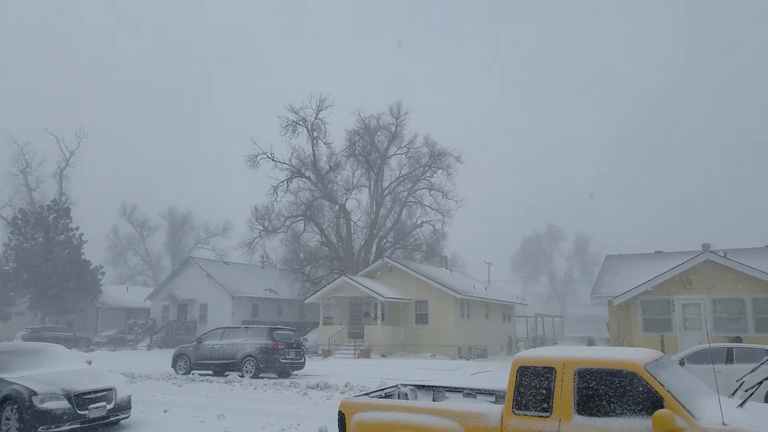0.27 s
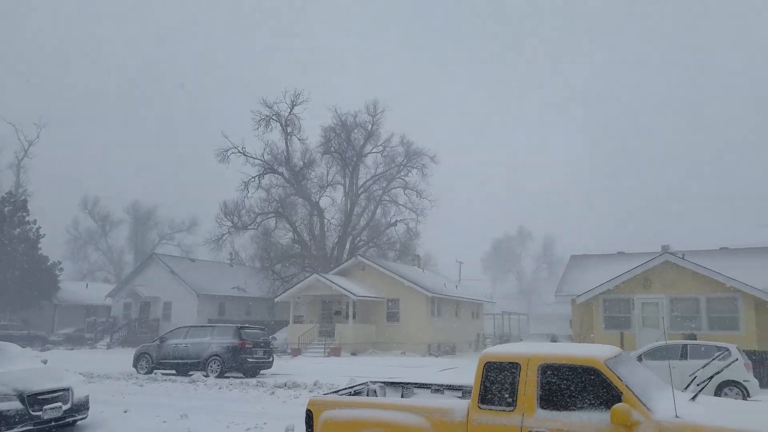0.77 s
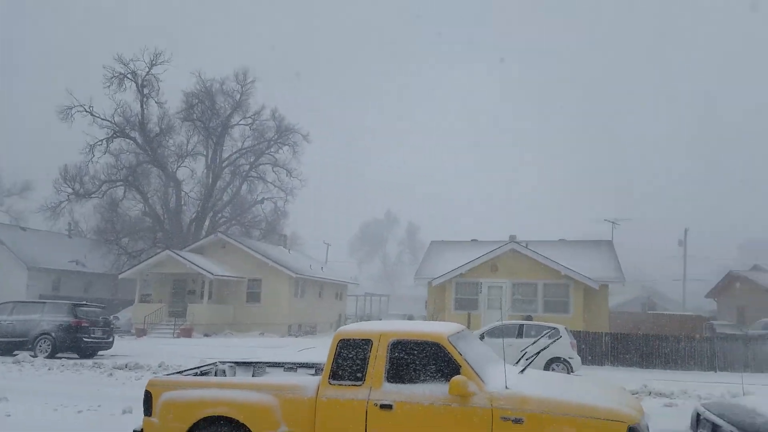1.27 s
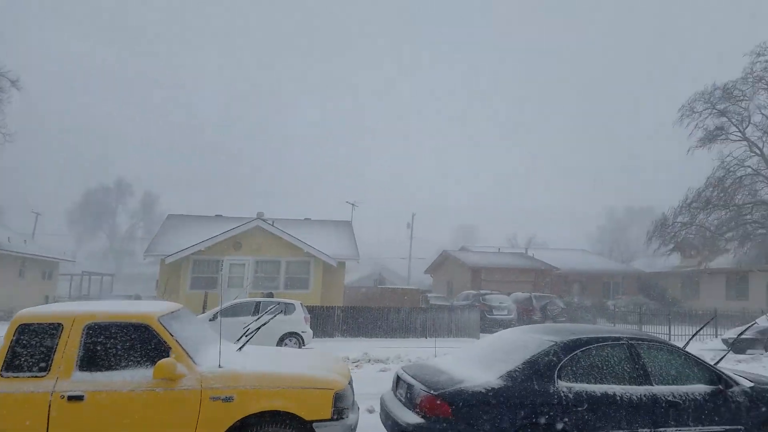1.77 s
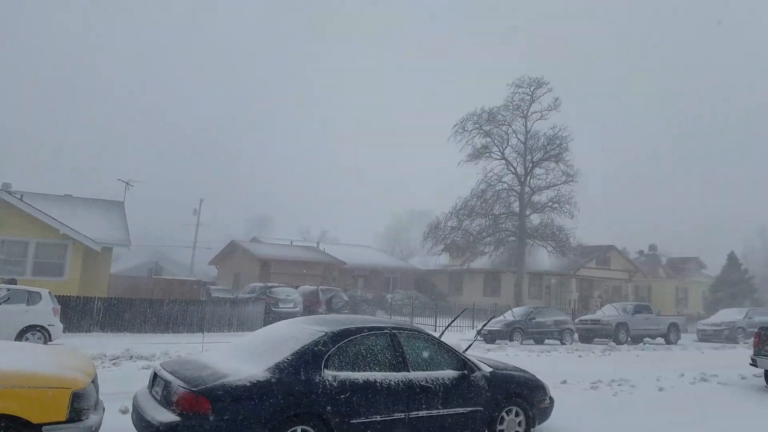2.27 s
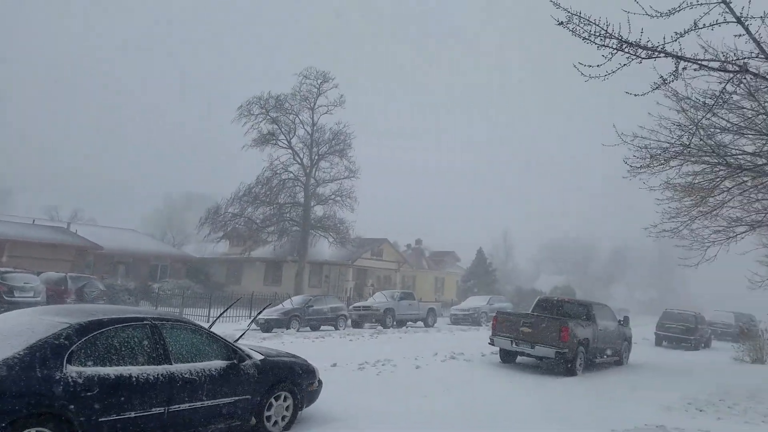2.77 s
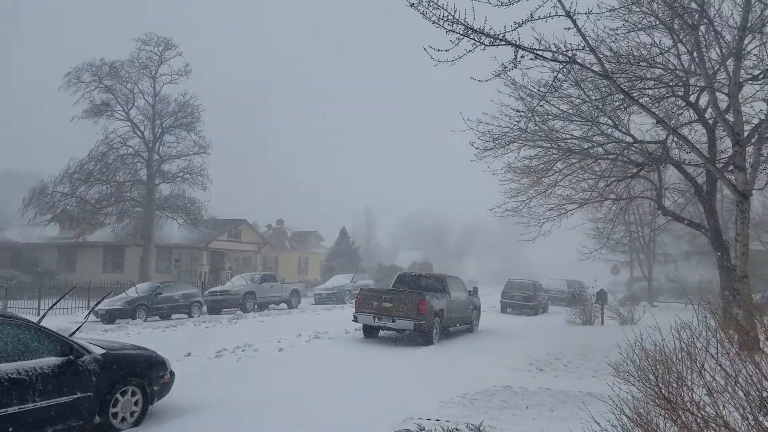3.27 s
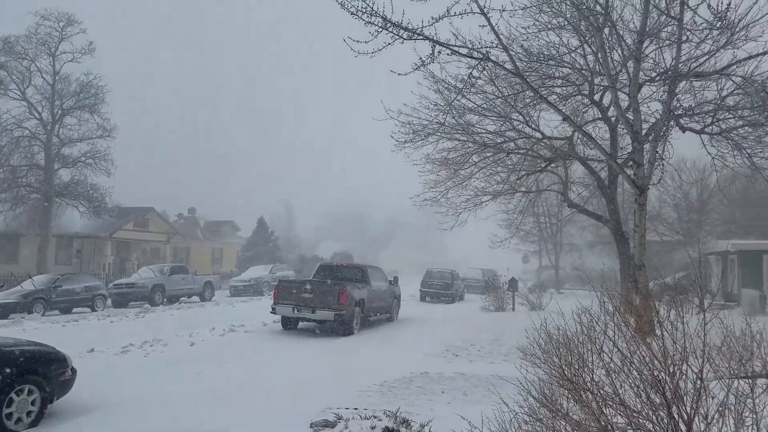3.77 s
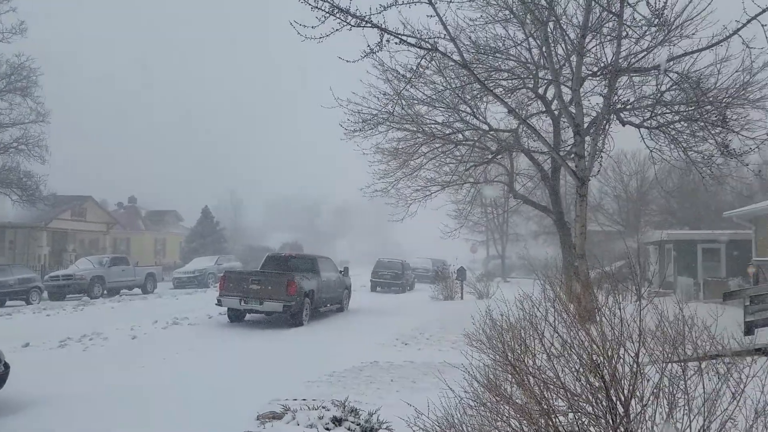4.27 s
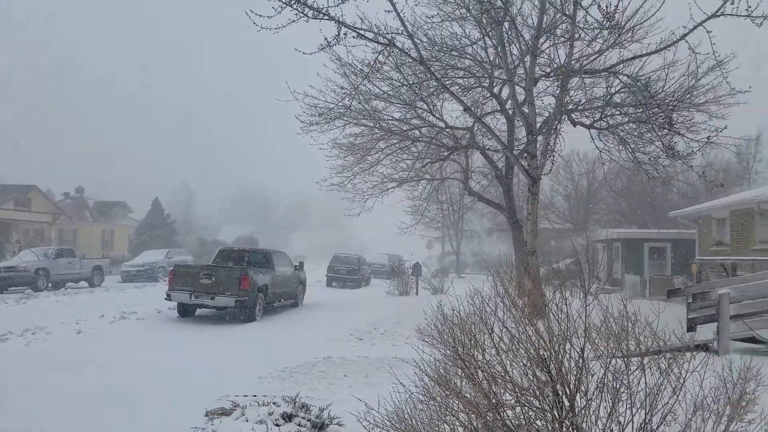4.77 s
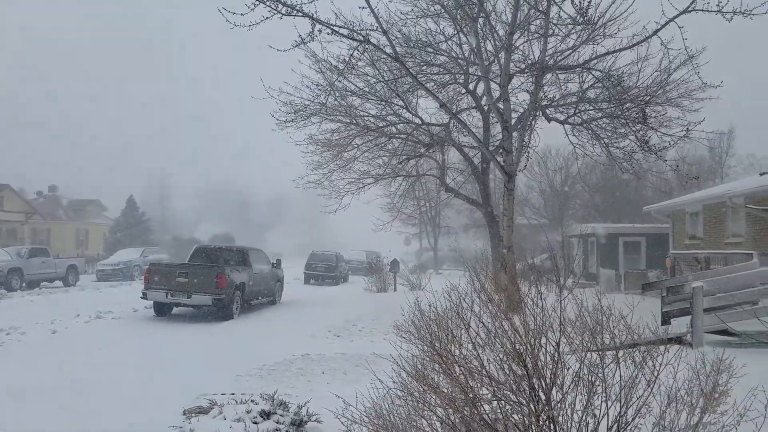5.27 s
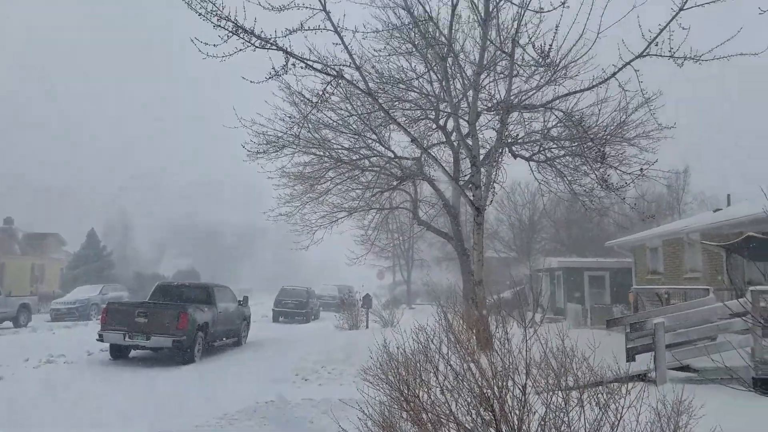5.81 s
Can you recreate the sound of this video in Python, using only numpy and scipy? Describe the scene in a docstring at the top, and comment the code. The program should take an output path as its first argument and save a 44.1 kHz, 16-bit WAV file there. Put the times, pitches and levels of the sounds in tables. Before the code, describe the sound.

A six-cylinder engine throbs at fast idle close by throughout, parked on a residential street in a snowstorm. At first its low drone is muffled, with a soft whir of belts and wind rushing through trees. Between about 1.6 and 2 seconds the microphone turns: the drone swells into a much louder boom, and the engine slides from slightly right to left. It stays dominant, wavering gently in speed and level. A faint high whine comes and goes around 1.5 seconds, and small gusts hiss in branches between 1 and 3.2 seconds. Two faint low howls follow near 3.3 and 4 seconds. Icy flakes tick on the microphone, with one sharper tap on the left at 3.5 seconds; the ticks and a fine hiss thicken after 5 seconds. Wind buffets the microphone with low thumps from about 4.5 seconds, strongest at 6 seconds.

```python
"""A six-cylinder engine throbs at fast idle close by, parked on a residential street in a snowstorm.
Its firings drone from the exhaust and boom as the microphone turns; the whir of belts slides left.
Wind rushes through the trees and buffets the microphone's two ports; a few thin tones come and go.
Thickening snow hisses past, and icy flakes tick on the microphone's housing."""
import sys
import numpy as np
from scipy import signal
from scipy.fft import rfft, irfft
from scipy.io import wavfile

SR = 44100
rng = np.random.default_rng(int(sys.argv[2]) if len(sys.argv) > 2 else 0)


def generate_wav(signal):
    """Clip the signal to [-1, 1] and save it as 16-bit WAV at the path in sys.argv[1]."""
    frames = np.transpose(np.atleast_2d(signal))
    scaled = np.clip(frames, -1, 1) * 32767
    pcm = np.round(scaled).astype(np.int16)
    wavfile.write(sys.argv[1], SR, pcm)


N = 266496
TIME = np.arange(N) / SR
FREQS = np.fft.rfftfreq(N, 1 / SR)
BOOM_REF_DB = -25.5   # drone level at which boom_db is 0


# firing tones: (crank multiple [x], level re drone [dB], share of boom followed [ratio])
EXHAUST_TONES = [(3, -11, .85), (4.5, -9.3, .82), (5, -27, .8), (6, -.1, 1), (7.5, -27, .9), (9, -15, .85),
                 (10.5, -23, .7), (12, -34, .7), (13.5, -23, .55)]

def exhaust(turns, boom_db, unsteady_db=0.02, roughness=0.022, surge_turns=0.0085, pipe_lag_rad=0.52):
    """Firings give tones on crank multiples; the pipe delays each differently, and no two firings match."""
    load_db = unsteady_db * drift(7)
    # unequal cylinders: the crank surges and lags once in two turns
    crank = turns + surge_turns * np.sin(np.pi * turns)
    tones = 0
    for multiple, db, share in EXHAUST_TONES:
        level_db = BOOM_REF_DB + db + share * boom_db + load_db
        phase = 2 * np.pi * multiple * crank - pipe_lag_rad * multiple ** 2 + roughness * drift(19)
        flutter = 1 + roughness * drift(9.7)
        tones += np.sqrt(2) * from_db(level_db) * flutter * np.sin(phase)
    return from_engine(tones)


# tailpipe noise: (frequency [Hz], density [dB/Hz])
RUMBLE_SPECTRUM = [(40, -92), (70, -63.5), (105, -52), (135, -65.5), (175, -61.5), (210, -70.5), (255, -70),
                   (300, -69.5), (350, -78.5), (600, -92)]

def tailpipe_rumble(turns, boom_db):
    """Gas leaves the tailpipe in turbulent puffs."""
    puffs = firing_pulses(turns, bank_depth=0.33, engine_depth=0.25)
    return from_engine(noise(RUMBLE_SPECTRUM) * puffs * from_db(boom_db))


# belt-driven hums: (crank multiple [x], level [dB], share of boom followed [ratio])
FAN_HUMS = [(15.3, -47.5, .55), (16.9, -54.5, -.15)]

def fan_and_pump(turns, boom_db, waver_db=1.6, slip_rad=0.33):
    """Belt-driven fan and pump hum between the crank's harmonics."""
    hums = 0
    for multiple, db, share in FAN_HUMS:
        level_db = db + share * boom_db + waver_db * drift(6.2)
        phase = 2 * np.pi * multiple * turns + slip_rad * drift(5.5)
        hums += np.sqrt(2) * from_db(level_db) * np.sin(phase)
    return from_engine(hums)


# belt and pulley noise: (frequency [Hz], density [dB/Hz])
WHIR_SPECTRUM = [(250, -79), (400, -82), (560, -75), (850, -81), (1080, -83), (1450, -80), (1600, -85.5),
                 (1780, -79), (2050, -84.5), (2600, -88.5), (3300, -94), (4000, -94.5), (6000, -105),
                 (9000, -118)]
# bay resonances: (frequency [Hz], width [Hz], level [dB], pan L-R [dB])
BAY_RINGS = [(1450, 17, -62, 3), (1680, 24, -64, -3), (1757, 40, -67, -2), (1999, 46, -61.5, -3.5),
             (2101, 42, -63, -2)]

def engine_bay(turns, whir_db, waver_db=2.0):
    """Belts and pulleys whir, throbbing with the firings, and keep a few narrow rings going."""
    throb = firing_pulses(turns, bank_depth=0.1, engine_depth=0.14)
    bay = from_engine(noise(WHIR_SPECTRUM) * throb * from_db(whir_db + 0.72 * drift(9)))
    for hz, width_hz, db, pan_db in BAY_RINGS:
        ring = narrow_noise(hz, width_hz) * from_db(db + whir_db + waver_db * drift(5))
        bay += from_engine(ring) * panned(pan_db)
    return bay


def firing_pulses(turns, bank_depth, engine_depth):
    """Each bank fires three times in two turns, the whole engine six times."""
    return 1 + bank_depth * np.cos(3 * np.pi * turns) + engine_depth * np.cos(6 * np.pi * turns)


def microphone_turn(speed_rps, start_s=1.58, length_s=0.46, idle_rps=17.2, rev_db_per_rps=4,
                    muffled_db=-36.5, booming_db=-23.5, whir_before_db=-5, whir_after_db=-1):
    """Boom and whir gains in dB: both rise as the microphone turns; the boom then follows the speed."""
    turned = np.clip((TIME - start_s) / length_s, 0, 1)
    revving_db = booming_db + rev_db_per_rps * (speed_rps - idle_rps)
    drone_db = muffled_db + turned * (revving_db - muffled_db)
    whir_db = whir_before_db + turned * (whir_after_db - whir_before_db)
    facing_bay_db = 0.5 * swell(centre_s=2.1, length_s=0.6)
    return drone_db - BOOM_REF_DB, whir_db + facing_bay_db


# engine bearing: (time [s], lead at left port [ms])
LEFT_LEAD_MS = [(0, -0.24), (.75, -0.19), (1.35, 0.013), (1.95, 0.27), (2.3, 0.4), (2.8, 0.51),
                (6.04, 0.45)]

def from_engine(sound):
    """The engine's sound reaches the nearer port first."""
    lead_s = in_time(LEFT_LEAD_MS) / 1000
    return np.array([np.interp(TIME + side * lead_s / 2, TIME, sound) for side in (1, -1)])


# idle speed: (time [s], crank rate [turns/s])
CRANK_RPS = [(0.0, 17.57), (0.45, 17.59), (0.95, 17.31), (1.35, 16.95), (1.75, 16.97), (2.1, 17.46),
             (2.4, 17.64), (2.65, 17.28), (3.15, 17.1), (3.88, 16.95), (4.17, 17.18), (4.45, 17.0),
             (4.73, 17.45), (4.97, 17.12), (5.5, 17.41), (5.78, 16.86), (6.04, 17.01)]

def engine(shade_db_per_ms=3.5):
    """The engine hunts about its idle; with the exhaust on the left, the right port is slightly shaded."""
    speed_rps = in_time(CRANK_RPS)
    turns = np.cumsum(speed_rps) / SR
    boom_db, whir_db = microphone_turn(speed_rps)
    drone = exhaust(turns, boom_db) + tailpipe_rumble(turns, boom_db) + fan_and_pump(turns, boom_db)
    shade_db = shade_db_per_ms * np.maximum(in_time(LEFT_LEAD_MS), 0)
    return drone * panned(shade_db) + engine_bay(turns, whir_db)


# wind strength: (time [s], rush gain [dB])
RUSH_GAIN_DB = [(0, 1.2), (1.4, 2.5), (2.2, 5), (3.6, 1.5), (6.04, 0)]
# rush in trees, hiss in twigs: (frequency [Hz], density [dB/Hz])
RUSH_SPECTRUM = [(100, -74.5), (350, -76), (600, -77.5), (850, -78.5), (1100, -87), (1500, -85),
                 (2000, -85.5), (2500, -88), (3200, -96.5), (5000, -112)]
TWIG_SPECTRUM = [(2000, -108), (3000, -97.5), (4000, -96.5), (5500, -103), (6200, -101), (7100, -106),
                 (8000, -103), (9200, -114), (12000, -120)]

def wind_in_trees(waver_db=0.98, twigs_start_db=-4.5, twigs_db_per_s=1.22):
    """Wind rushes through the trees; the hiss of bare twigs grows as the near tree comes round."""
    rush = diffuse(RUSH_SPECTRUM, alike_hz=750) * from_db(in_time(RUSH_GAIN_DB) + waver_db * drift(7.6))
    twigs_db = twigs_start_db + twigs_db_per_s * TIME
    twigs = diffuse(TWIG_SPECTRUM, alike_hz=480) * from_db(twigs_db + waver_db * drift(26))
    return rush + twigs


# buffeting: (frequency [Hz], density [dB/Hz])
EDDY_SPECTRUM = [(8, -91.5), (22, -72), (40, -70), (70, -56.5), (150, -77.5), (300, -75.5), (600, -91.5)]
# strongest eddies: (time [s], gain [dB])
EDDY_THUMPS = [(4.55, 3), (5.0, -2), (5.68, 0), (5.98, 9.5)]

def port_eddies(start_db=-20.5, rise_db_per_s=4, thump_s=0.13, waver_db=1.5):
    """Eddies buffet the ports harder as the microphone leaves shelter; the strongest thump."""
    thumps = sum(from_db(db) * swell(s, thump_s) for s, db in EDDY_THUMPS)
    gain = from_db(start_db + rise_db_per_s * TIME) + thumps
    return diffuse(EDDY_SPECTRUM, alike_hz=40) * gain * from_db(waver_db * drift(4))


# gusts in branches: (time [s], level [dB])
BRANCH_GUSTS = [(0.966, -52), (1.45, -53), (1.95, -54), (2.4, -56), (3.2, -49.5)]
# sheets of loose snow: (time [s], length [s], level [dB])
SNOW_SWISHES = [(0.1, 0.81, -67.5), (2.4, 0.4, -67)]

def gusts():
    """Gusts swell and fade, singing in branches and sweeping loose snow along."""
    branches = air_band(hz=2230, width_hz=770)
    branches *= sum(from_db(db) * swell(s, length_s=0.15) for s, db in BRANCH_GUSTS)
    loose_snow = air_band(hz=5200, width_hz=2000)
    loose_snow *= sum(from_db(db) * swell(s, length_s) for s, length_s, db in SNOW_SWISHES)
    return branches + loose_snow


# whine and howls: (time [s], length [s], frequency [Hz], width [Hz], level [dB])
THIN_TONES = [(1.5, 1.06, 1467, 60, -52), (3.3, 0.42, 467, 23, -50), (4.05, 0.33, 467, 20, -51)]

def thin_tones():
    """Thin tones come and go: a high belt-like whine and two low howls."""
    return sum(air_band(hz, width_hz) * from_db(db) * swell(s, length_s)
               for s, length_s, hz, width_hz, db in THIN_TONES)


# snowfall: (time [s], flakes per port [1/s])
FLAKES_PER_S = [(0, 20), (3.4, 34), (5.1, 65), (5.35, 130), (6.04, 140)]
# fine snow: (frequency [Hz], density [dB/Hz])
SNOW_SPECTRUM = [(5000, -116), (8000, -110), (9400, -110), (11000, -106), (13000, -103.5), (15500, -102.5),
                 (17000, -103)]

def snow(smallest_db=-55.5, spread_db=5.0, knock_db=-2, ref_per_s=43, db_per_doubling=1.4):
    """Flakes tick at random on either port and fine snow hisses past, both louder as the fall thickens."""
    rate_per_s = in_time(FLAKES_PER_S)
    thickness_db = db_per_doubling * np.log2(rate_per_s / ref_per_s)
    size_db = smallest_db + spread_db * np.minimum(rng.exponential(1, (2, N)), np.e)
    landings = rng.random((2, N)) < rate_per_s / SR
    ticks = from_db(size_db + thickness_db) * landings * rng.choice([-1, 1], (2, N))
    hiss = diffuse(SNOW_SPECTRUM, alike_hz=480) * from_db(thickness_db + 0.5 * drift(20))
    return housing(ticks, ticks * from_db(knock_db)) + hiss


# larger grains: (time [s], impact level [dB], pan L-R [dB], knock re tick [dB])
GRAIN_HITS = [(.0885, -45, -10, 3), (.0965, -44, -8, 4), (3.0619, -45, 8, -10), (3.4935, -33.5, 21.5, 9.5),
              (3.6706, -46, 8, -10), (4.6483, -39, 11, -15), (4.8519, -37, 15, -15), (4.9716, -42, 8.5, -6),
              (5.3398, -44, -7, -3), (5.4188, -42, .5, -4), (5.676, -44, 5, -10), (5.874, -38.5, 12, -6),
              (5.9793, -45, 1, 0)]

def ice_grains(fragment_gain=0.33, shatter_s=0.0012):
    """Icy grains knock on the housing and break up for about a millisecond."""
    ticks, knocks = np.zeros((2, N)), np.zeros((2, N))
    age_s = np.arange(SR // 250) / SR
    for s, db, pan_db, knock_db in GRAIN_HITS:
        start, sides = int(s * SR), panned(pan_db)
        impact = -from_db(db) * sides / sides.mean()
        fragments = fragment_gain * rng.standard_normal(len(age_s)) * np.exp(-age_s / shatter_s)
        ticks[:, start:start + len(age_s)] += impact * ((age_s == 0) + fragments)
        knocks[:, start:start + 1] += impact * from_db(knock_db)
    return housing(ticks, knocks)


# housing resonances: (frequency [Hz], gain [dB], T60 [s])
HOUSING_MODES = [(900, 6.5, 0.00096), (3020, -0.5, 0.0018), (6430, -19.5, 0.0078), (8200, -10, .005),
                 (10600, -4.5, 0.00076), (13000, -3.5, .0012), (15100, -8.5, .002)]

def housing(ticks, knocks, split_hz=9400):
    """The microphone's housing rings briefly: knocks drive its lower modes, ticks its upper ones."""
    ringing = 0
    for hz, db, t60_s in HOUSING_MODES:
        radius, angle = from_db(-60 / (t60_s * SR)), 2 * np.pi * hz / SR
        feedback = [1, -2 * radius * np.cos(angle), radius ** 2]
        drive = knocks if hz < split_hz else ticks
        ringing += from_db(db) * signal.lfilter([0, np.sin(angle)], feedback, drive + 1e-18)
    return ringing


def from_db(db):
    """Decibels to gain."""
    return 10 ** (np.asarray(db) / 20)


def panned(pan_db):
    """Left and right gains for a level difference."""
    return from_db(np.array([[0.5], [-0.5]]) * pan_db)


def in_time(curve):
    """A curve's value at every sample."""
    return np.interp(TIME, *np.transpose(curve))


def in_frequency(curve):
    """A curve's value at every FFT bin, interpolated in log frequency."""
    hz, values = np.transpose(curve)
    return np.interp(np.log(FREQS + 1e-9), np.log(hz), values)


def swell(centre_s, length_s):
    """A smooth rise to 1 and fall."""
    return np.exp(-2 * ((TIME - centre_s) / length_s) ** 2)


def drift(rate_hz):
    """Slow random wander; rms 1."""
    slow = irfft(rfft(rng.standard_normal(N)) / (1 + (FREQS / rate_hz) ** 2), N)
    return (slow - slow.mean()) / slow.std()


def noise(spectrum):
    """Noise of the given density, falling away beyond the ends of its spectrum."""
    low_cut = FREQS / np.hypot(FREQS, spectrum[0][0] / 2)
    high_cut = 1 / (1 + (FREQS / (2 * spectrum[-1][0])) ** 4)
    shape = from_db(in_frequency(spectrum)) * low_cut * high_cut
    return irfft(rfft(rng.standard_normal(N)) * shape, N) * np.sqrt(SR / 2)


def diffuse(spectrum, alike_hz):
    """Noise from all round: alike at both ports only where the waves are long."""
    alike = 1 / (1 + (FREQS / alike_hz) ** 4)
    mid = np.sqrt((1 + alike) / 2) * rfft(noise(spectrum))
    side = np.sqrt((1 - alike) / 2) * rfft(noise(spectrum))
    return irfft([mid + side, mid - side], N)


def narrow_noise(hz, width_hz):
    """Noise twice through one resonance; rms 1."""
    band = irfft(rfft(rng.standard_normal(N)) / (1 + ((FREQS - hz) / (width_hz / 2)) ** 2), N)
    return band / band.std()


def air_band(hz, width_hz):
    """An airy band of noise, unrelated at the two ports."""
    return np.array([narrow_noise(hz, width_hz), narrow_noise(hz, width_hz)])


def scene():
    """Engine, wind and snow at the two ports."""
    return engine() + wind_in_trees() + port_eddies() + gusts() + thin_tones() + snow() + ice_grains()


# port colour: (frequency [Hz], L-R [dB])
PORT_BALANCE_DB = [(300, -0.7), (750, 1), (1100, -2.5), (1500, -6), (2000, -10.5), (3000, -7.5), (4200, -7),
                   (6000, -3), (8000, -0.5), (10000, 1), (16000, 4)]

def record(dry):
    """Each port colours the sound in its own way; the top is cut steeply."""
    cutoff_hz = 15850
    coloured = rfft(dry) * panned(in_frequency(PORT_BALANCE_DB))
    return irfft(coloured / np.sqrt(1 + (FREQS / cutoff_hz) ** 160), N)


dry = scene()
out = record(dry)
generate_wav(out)
```